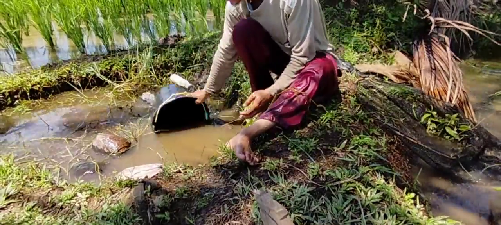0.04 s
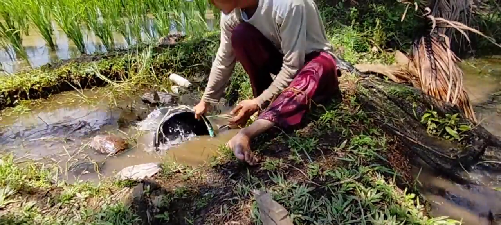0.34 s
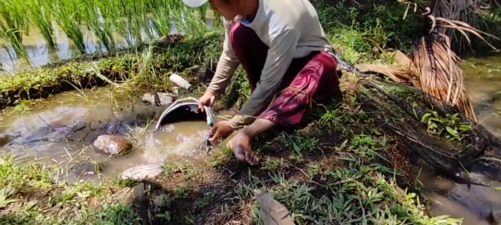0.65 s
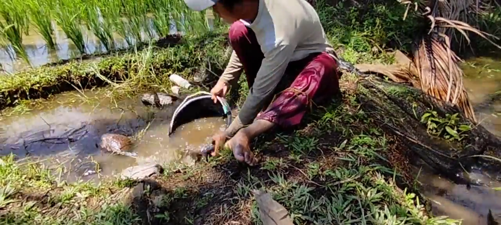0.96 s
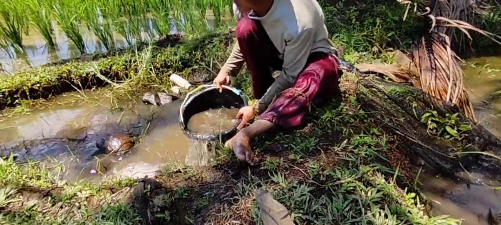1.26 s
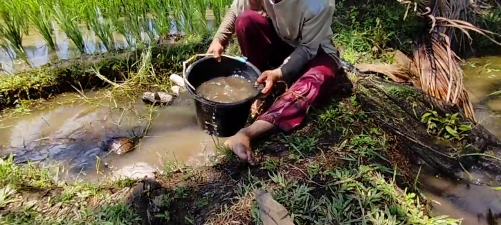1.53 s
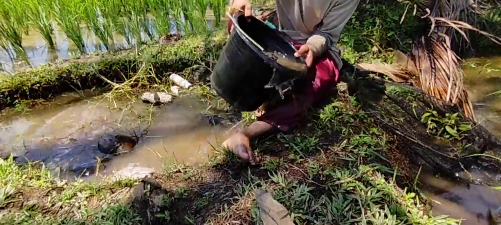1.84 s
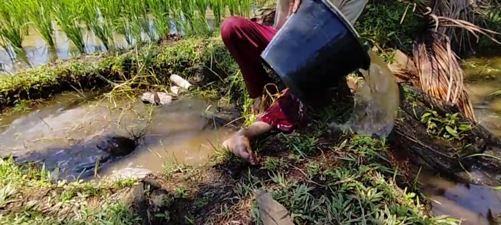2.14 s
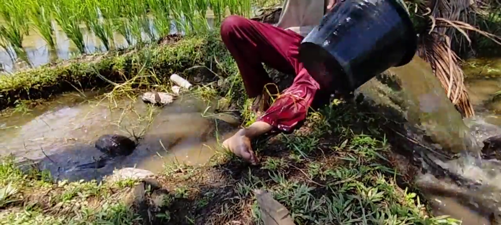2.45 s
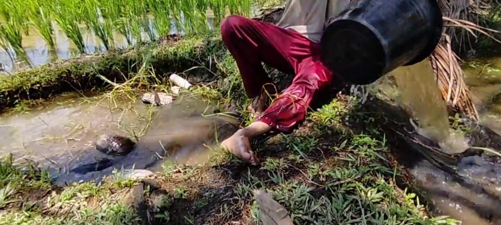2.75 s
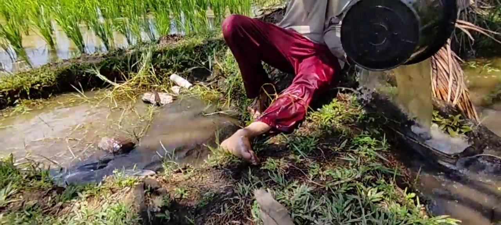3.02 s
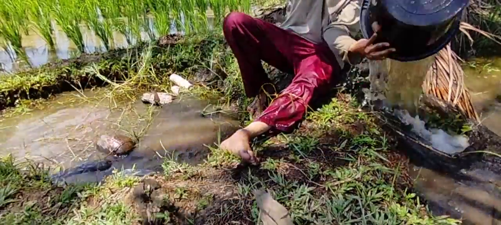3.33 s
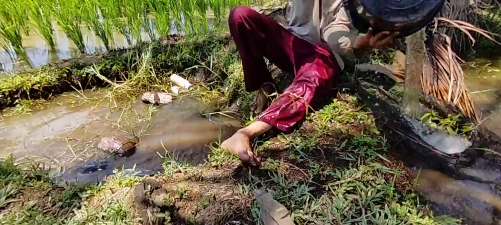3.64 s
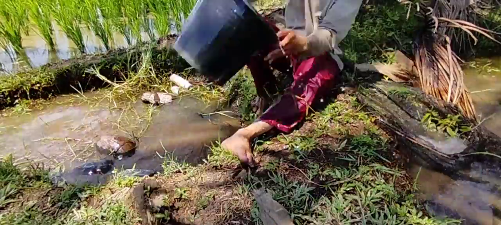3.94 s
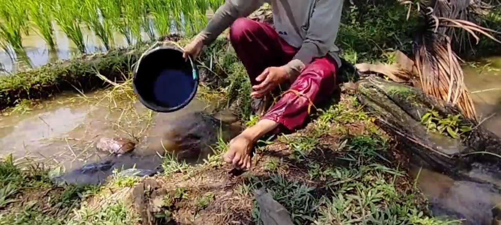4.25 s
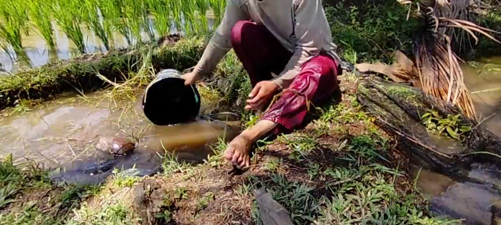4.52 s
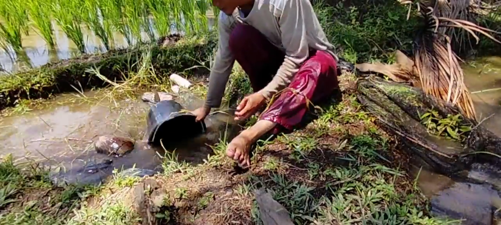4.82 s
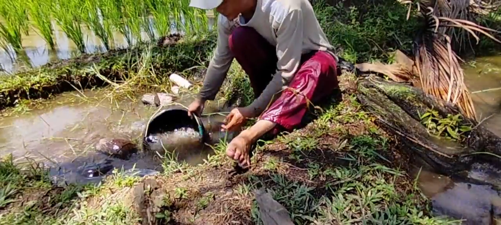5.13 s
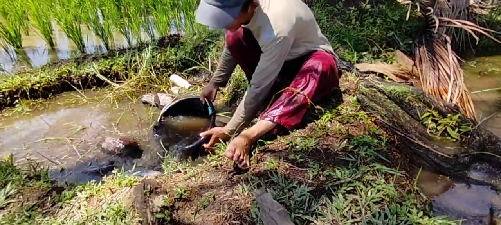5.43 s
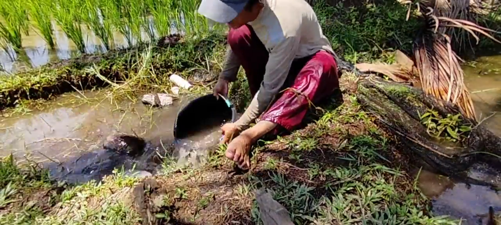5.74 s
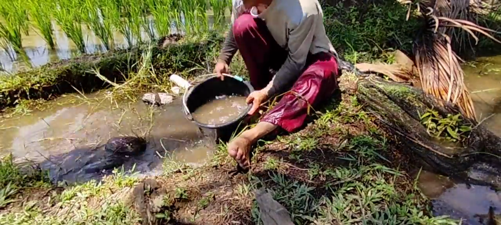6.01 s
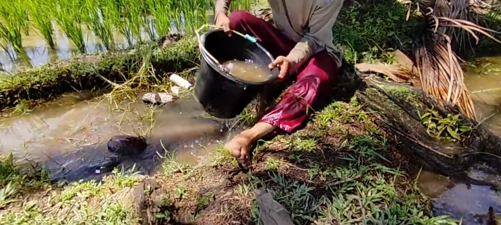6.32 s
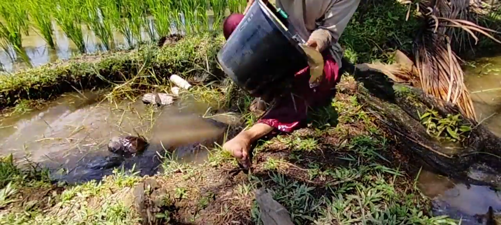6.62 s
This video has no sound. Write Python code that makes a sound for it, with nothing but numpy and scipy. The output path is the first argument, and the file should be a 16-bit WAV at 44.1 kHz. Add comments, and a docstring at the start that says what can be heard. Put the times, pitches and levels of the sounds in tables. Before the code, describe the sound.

A plastic bucket dips into a shallow pool close by, with a small splash and a few plops, and water gurgles softly over its rim until about 1.5 seconds. At 2 seconds, with a bump of wind on the microphone, the water starts pouring into a ditch. The splashing, churning stream is fullest around 2.6 seconds, and two dull slaps stand out at 3 seconds. It thins into sharp spatters and drips, ending near 3.8 seconds. A few small drops follow. At about 4.7 seconds the bucket dips again, with a splash and a distinct plop, then fills with quiet bubbling until just after 6 seconds, when there is a very faint, high squeak. A little splashing starts at the very end. Throughout, light wind rumbles and flutters unevenly on the microphone, over the faint, even hiss of water trickling in the field.

```python
"""Beside a paddy, a plastic bucket is dipped into a muddy pool, emptied into a ditch, then dipped again.
The water sounds through bubbles, each a damped oscillator of trapped air, and through drop impacts;
a few plops stand out, and two dull slaps during the pour. Behind it, light wind buffets a small
microphone over the even hiss of water trickling in the field."""
import sys
import numpy as np
from scipy import signal
from scipy.io import wavfile
from scipy.ndimage import uniform_filter1d

SR = 44100
rng = np.random.default_rng(int(sys.argv[2]) if len(sys.argv) > 2 else 0)


def dump_mix(stems):
    """Bounce the given channels to the path in sys.argv[1] as a 16-bit WAV at rate SR."""
    frames = np.atleast_2d(stems).T  # one column per channel
    limited = np.clip(frames, -1, 1)  # hard clip at full scale
    pcm = np.round(limited * 32767).astype(np.int16)
    wavfile.write(sys.argv[1], SR, pcm)


N = 294147
TIME = np.arange(N) / SR
BAND_LIMIT_HZ = 15900
FIZZ_LAW = dict(full_db=-37, exponent=.35, build_s=.084)

# strength of the stream falling into the ditch: (t/s, level/dB)
STREAM_FLOW = [(1.97, -13), (2.06, -15), (2.19, -4.5), (2.38, -5), (2.56, 0), (2.95, -5), (3.24, -5),
               (3.6, -16), (3.77, -35)]
# spectrum of the finest drop impacts: (f/Hz, level/dB)
TICK_SPECTRUM = [(2500, -35), (5000, 4.5), (7000, 3.5), (12000, 0.5), (16000, -3.5)]


def gain_of(db):
    """Amplitude ratio of a level in decibels."""
    return 10 ** (np.asarray(db) / 20)


def unit_rms(x):
    """Normalisation to unit mean power."""
    return x / np.sqrt(np.mean(x ** 2) + 1e-20)


def add(mix, start_s, sound):
    """Superposition of a sound on the mix."""
    part = mix[max(round(start_s * SR), 0):][:len(sound)]
    part += sound[:len(part)]


def envelope(rows):
    """Amplitude envelope interpolated from (t/s, level/dB)."""
    return gain_of(np.interp(TIME, *np.transpose(rows)))


def coloured(x, spectrum, size=4096):
    """Minimum-phase filtering by a response given as (f/Hz, level/dB)."""
    hz, db = np.transpose(spectrum)
    bin_hz = abs(np.fft.fftfreq(size, 1 / SR))
    log_gain = np.log(gain_of(np.interp(np.log(bin_hz + 1), np.log(hz), db)))
    taps = np.fft.ifft(np.exp(np.conj(signal.hilbert(log_gain)))).real
    return signal.oaconvolve(x, taps[:size // 2])[:N]


def wander(per_s):
    """Random modulation of unit rms, with per_s new values a second."""
    return unit_rms(np.interp(TIME * per_s, np.arange(N), rng.standard_normal(N)))


def resonate(x, hz, width_hz):
    """A damped resonator of unit gain whose natural frequency follows the curve hz."""
    carrier = np.exp(2j * np.pi * np.cumsum(hz) / SR)
    pole = np.exp(-np.pi * width_hz / SR)
    return 2 * (carrier * signal.lfilter([1 - pole], [1, -pole], x / carrier)).real


def bubbles(low_hz, high_hz, cycles, rise, spread_db, count, size=700):
    """Free oscillation of many bubbles: each rings down, rising in pitch as it nears the surface."""
    when, pitch, strength, ring, lift = rng.random((count, 5)).T[:, :, None]
    hz = low_hz + (high_hz - low_hz) * pitch ** 2
    turns = hz * np.arange(size) / SR
    age = turns / (cycles * (.5 + ring))
    excess_db = spread_db * np.minimum(-np.log(1 - strength), 3)
    height = hz ** .75 * gain_of(excess_db)  # about even in power over pitch
    phase = 2 * np.pi * turns * (1 + rise * lift * age)
    rings = height * np.exp(-age) * (1 - np.exp(-2 * turns)) * np.sin(phase)
    rings *= np.linspace(1, 0, size) ** .5
    samples = (when * N).astype(int) + np.arange(size)
    return unit_rms(np.bincount(samples.ravel(), rings.ravel(), N)[:N])


def spatter(per_s, spread_db):
    """Shot noise of drop impacts, many small and a few large."""
    height = gain_of(spread_db * np.minimum(rng.exponential(1, N), 4))
    return unit_rms(height * rng.choice([-1, 1], N) * (rng.random(N) < per_s / SR))


def field(db=-50):
    """Incoherent addition blurs distant trickling into a hiss, with a few faint bubbles and drips."""
    # spectrum of the distant water: (f/Hz, level/dB)
    spectrum = [(30, -4), (150, -2.5), (400, -2), (1200, 0.5), (2200, -2.5), (4000, -3.5), (6000, -6.5),
                (8500, -10.5), (12000, -10.5), (16000, -17.5)]
    trickle = bubbles(554, 5870, cycles=6, rise=.026, spread_db=6, count=2000, size=500)
    trickle += spatter(150, 6)
    sway = gain_of(.4 * wander(5))
    hiss = rng.standard_normal(N) + gain_of(-13.5) * trickle
    return gain_of(db) * unit_rms(coloured(hiss, spectrum) * sway)


def wind(eddy_cycles=.51, gust_db=-24):
    """Turbulent pressure at the microphone rumbles and, in gusts, flutters; an eddy pushes and pulls."""
    # strength of the wind: (t/s, level/dB)
    strength_curve = [(0.0, -15), (.13, -32.5), (.4, -28.5), (.73, -42.5), (.8, -28), (1.0, -38.5),
                      (1.28, -36), (1.4, -55), (1.53, -38.5), (1.68, -56.5), (1.92, -37.5), (2.0, -19),
                      (2.12, -21.5), (2.3, -30), (2.56, -22.5), (2.68, -31), (2.82, -20), (2.99, -45),
                      (3.25, -25), (3.6, -30.5), (3.8, -40), (3.89, -36.5), (4.22, -45.5), (4.36, -44),
                      (4.47, -32.5), (4.6, -27.5), (4.75, -48), (4.93, -46), (5.04, -35), (5.54, -34),
                      (5.92, -55), (6.02, -39), (6.16, -44.5), (6.26, -34.5), (6.67, -48)]
    # spectra of slow and fast turbulence: (f/Hz, level/dB)
    rumble_spectrum = [(20, -55), (40, -48), (65, -4.5), (100, 8), (170, -0.5), (250, -15), (350, -30),
                       (500, -65.5), (1000, -45.5)]
    flutter_spectrum = [(60, -10), (150, 0.5), (230, 3.5), (330, -4), (480, -14), (900, -24.5),
                        (2000, -101)]
    # strongest eddies at the microphone port: (t/s, envelope peak level/dB, f/Hz)
    eddies = [(0.026, -18.5, 222), (0.056, -12, 139), (0.084, -21, 200), (.234, -18, 199),
              (0.386, -19, 100), (0.893, -17, 117), (1.992, -9, 223), (1.999, -9.5, 169), (2.025, -16, 227),
              (2.073, -16, 271), (2.207, -13.5, 130), (3.263, -20.5, 144), (3.874, -23.5, 148),
              (3.921, -23.5, 156), (4.399, -25.5, 164), (4.715, -25.5, 121), (4.82, -24.5, 95),
              (5.018, -20.5, 158), (5.118, -25, 128), (5.151, -19, 138.5), (5.3, -23, 160),
              (5.443, -16.5, 143), (6.324, -17.5, 165)]
    rumble = unit_rms(coloured(rng.standard_normal(N), rumble_spectrum))
    rumble /= np.sqrt(abs(uniform_filter1d(rumble ** 2, size=2600)) + .05)  # steadies its level
    flutter = unit_rms(coloured(rng.standard_normal(N), flutter_spectrum))
    strength = envelope(strength_curve)
    gust = np.sqrt(strength / gain_of(gust_db))
    lumps = unit_rms(gain_of(4.35 * wander(27)))
    out = gain_of(-1.5) * (unit_rms(rumble) + gain_of(-8) * gust * flutter) * strength * lumps
    t = np.arange(-SR // 50, SR // 50) / SR
    for s, db, hz in eddies:
        bell = np.exp(-.5 * (t * hz / eddy_cycles) ** 2)
        add(out, s + t[0], gain_of(db) * bell * np.sin(2 * np.pi * hz * t))
    return out


def squeak(start_s=6.015, length_s=.11, high_hz=10550, low_hz=7900, jitter_hz=110, db=-56):
    """Two frequency-modulated tones squeak faintly as the bucket lifts: one holds, one slides down."""
    t = np.arange(0, length_s, 1 / SR)
    slide_hz = np.interp(t, [length_s * .4, length_s * .85], [high_hz, low_hz])
    held, sliding = (np.sin(2 * np.pi * np.cumsum(hz + jitter_hz * wander(1660)[:len(t)]) / SR)
                     for hz in (high_hz, slide_hz))
    out = np.zeros(N)
    add(out, start_s, gain_of(db) * (held + sliding) * signal.windows.tukey(len(t), .5))
    return out * gain_of(4 * wander(250))


def scatter(x, t60=.07):
    """Diffuse reflection from the banks and the bucket adds a faint, short tail."""
    t = np.arange(SR // 10) / SR
    tail = rng.standard_normal(len(t)) * gain_of(-60 * t / t60)
    return x + gain_of(-15) * signal.oaconvolve(x, tail / np.linalg.norm(tail))[:N]


def swells(rows, peak_at, edge_db, fade_s=.0095):
    """Envelopes of moving water: each peaks at the fraction peak_at of its length, then ebbs."""
    out = np.zeros(N)
    for s, length, db in rows:
        t = np.arange(0, length, 1 / SR)
        off_peak = np.interp(t / length, [0, peak_at, 1], [1, 0, 1])
        fade = np.minimum(np.minimum(t, length - t) / fade_s, 1)
        add(out, s, gain_of(db + edge_db * off_peak ** 2) * fade)
    return out


def scoop_gains():
    """Dips, mostly spray, and fills, mostly bubbles, add in power within each part of the sound."""
    # the rim cuts the surface: (t/s, duration/s, level/dB)
    dips = [(.11, .1, -44.5), (.185, 0.21, -39.5), (4.722, 0.086, -42), (4.845, 0.19, -41),
            (6.61, 0.58, -50)]
    # water runs over the rim: (t/s, duration/s, level/dB)
    fills = [(.02, .66, -43), (.68, 0.58, -41), (1.27, 0.19, -45), (4.87, 0.37, -49.5), (5.28, 0.71, -43.5),
             (5.97, 0.16, -48)]
    dip = swells(dips, peak_at=.11, edge_db=-3)
    fill = swells(fills, peak_at=.37, edge_db=-7.5)
    return dict(gurgle=np.hypot(gain_of(-8) * dip, fill),
                splash=np.hypot(dip, gain_of(-6) * fill),
                fizz=np.hypot(gain_of(-7) * dip, gain_of(-16) * fill))


def pour_gain(full_db, exponent, build_s, stop_s=.047):
    """Amplitude is a power law of flow: a thin stream fizzes, only a heavy one traps air pockets."""
    starting = (TIME - STREAM_FLOW[0][0]) / build_s
    stopping = (STREAM_FLOW[-1][0] - TIME) / stop_s
    running = np.clip(np.minimum(starting, stopping), 0, 1)
    return gain_of(full_db) * envelope(STREAM_FLOW) ** exponent * running


def droplets(exponent=.49):
    """Sparse impacts tick wherever water moves; by a weak power law they stand out as the flow thins."""
    flow = scoop_gains()["fizz"] + pour_gain(**FIZZ_LAW)
    ticks = coloured(spatter(70, 3.5), TICK_SPECTRUM)
    return gain_of(-30) * unit_rms(ticks) * flow ** exponent


def smacks(octaves=1.6):
    """An impact of water radiates a burst of band-limited noise, longer in soft mud."""
    # water striking mud and plastic: (t/s, peak level/dB, centre f/Hz, decay time/s)
    impacts = [(1.344, -28.5, 7500, 0.0011), (1.982, -29, 8000, 0.0017), (2.848, -21, 3680, 0.0018),
               (3.022, -18.5, 4200, 0.0016), (3.076, -21, 3630, 0.0018), (3.243, -20, 3500, 0.0011),
               (3.29, -18, 4130, .0013), (3.488, -18.5, 8000, 0.0012), (3.618, -18.5, 5900, .0008),
               (3.634, -22, 4300, 0.001), (3.645, -20.5, 7000, 0.0012), (3.698, -21.5, 5000, 0.0013),
               (3.861, -33, 8500, 0.0019), (4.376, -37.5, 2150, 0.013), (4.516, -34.5, 1880, 0.0032),
               (4.607, -30, 2390, 0.012), (4.722, -32, 6000, .001), (4.737, -26, 2980, 0.0017),
               (4.766, -24, 2800, 0.0024), (4.927, -21, 3120, 0.00095), (5.012, -28.5, 2840, 0.0021)]
    out, t = np.zeros(N), np.arange(SR // 16) / SR
    for s, db, hz, decay in impacts:
        edges_hz = np.minimum(hz * 2 ** (octaves * np.array([-.5, .5])), BAND_LIMIT_HZ)
        spray = rng.standard_normal(len(t)) * np.sqrt(t) * np.exp(-t / decay)
        burst = signal.lfilter(*signal.butter(2, edges_hz, "band", fs=SR), spray)
        add(out, s, gain_of(db) * burst / abs(burst).max())
    return out


def plops_and_slaps(onset_cycles=.45):
    """Damped oscillations of rising pitch: plops of large bubbles, and two dull slaps during the pour."""
    # plops and slaps: (t/s, peak level/dB, f/Hz, cycles of f to fall 60 dB, rise/octaves)
    events = [(.194, -22.5, 757, 60, 0.36), (.226, -31, 710, 37, .1), (.275, -26, 1470, 26, .2),
              (.297, -28.5, 805, 62, 0.091), (.344, -27, 2540, 64, 0.092), (0.488, -34.5, 1610, 71, 0.11),
              (.574, -32.5, 1225, 53, 0.94), (.659, -37, 1020, 39, 0.5), (.946, -32.5, 910, 37, 0.25),
              (1.071, -30.5, 577, 29, .2), (1.288, -39, 694, 35, .15), (1.989, -23, 444, 12, 0.17),
              (2.582, -17, 1080, 17, .2), (2.957, -21.5, 1320, 26, .1), (3.005, -7.5, 710, 6.3, 0.78),
              (3.022, -13, 980, 9, 0.09), (3.075, -27, 1030, 16, .2), (3.202, -17, 1110, 15, .2),
              (3.818, -28, 2540, 16, .1), (4.381, -35.5, 960, 46, .1), (4.8904, -18.5, 700, 38, 0.071),
              (4.909, -29, 1960, 29, 0.071), (5.205, -32, 1260, 38, .6), (5.263, -38, 1270, 38, .2),
              (5.595, -31, 1208, 61, .1), (5.65, -32.5, 1090, 52, .2), (5.812, -30, 1410, 65, .1),
              (6.039, -33, 794, 11, .4), (6.123, -34.5, 2450, 55, .1)]
    out, t = np.zeros(N), np.arange(SR // 10) / SR
    for s, db, hz, cycles, rise in events:
        age = t * hz / cycles
        turns = np.cumsum(hz * 2 ** (rise * np.minimum(age, 1))) / SR
        swell = (1 - np.exp(-turns / onset_cycles)) ** 2 * gain_of(-60 * age)
        add(out, s, gain_of(db) * swell / swell.max() * np.sin(2 * np.pi * turns))
    return out


def scoops():
    """Air entrainment: water folds over the rim in bubbles; spray flies as the rim cuts the surface."""
    # spectra of the bubbling and the spray at the rim: (f/Hz, level/dB)
    gurgle_spectrum = [(250, -34), (420, -4), (750, 5.5), (1300, 3.5), (1900, -0.5), (3000, -9),
                       (5000, -12), (9000, -66)]
    splash_spectrum = [(700, 11), (1600, -7), (2400, -1), (3800, -4), (5500, -7.5), (8500, -28),
                       (14000, -27)]
    churn = bubbles(370, 4590, cycles=3.6, rise=.051, spread_db=-3, count=7000, size=500)
    ringing = bubbles(520, 3400, cycles=6.5, rise=.05, spread_db=3, count=1400, size=1400)
    cloud = churn + .5 * ringing + .5 * spatter(2400, 1.3)
    gurgle = unit_rms(coloured(cloud, gurgle_spectrum) * gain_of(2.37 * wander(50)))
    spray = bubbles(1700, 7000, cycles=9, rise=.02, spread_db=3.3, count=5000, size=500)
    spray += spatter(2300, 2.1)
    splash = unit_rms(coloured(spray, splash_spectrum) * gain_of(1.1 * wander(90)))
    fizz = unit_rms(coloured(spatter(2000, .7), TICK_SPECTRUM) * gain_of(1.6 * wander(220)))
    gains = scoop_gains()
    return gurgle * gains["gurgle"] + splash * gains["splash"] + fizz * gains["fizz"]


def pour(shallow_hz=1750, deep_hz=1085, width_hz=940, dig_s=.25):
    """A plunging jet breaks into clumps, entrains air and digs a cavity whose resonance falls."""
    # spectra of bubbles, air pockets, spray and finest drops in the ditch: (f/Hz, level/dB)
    gurgle_spectrum = [(300, -47), (650, -10.5), (920, -3.5), (1200, -7.5), (1550, -7.5), (1900, -21.5),
                       (3000, -22), (6000, -28.5)]
    pocket_spectrum = [(150, -3), (330, -2.5), (490, -0.5), (620, -3.5), (800, 0.5), (1300, -21),
                       (3000, -50)]
    splash_spectrum = [(600, -9.5), (1500, -6.5), (2500, -3), (3200, -2.5), (3950, -0.5), (5500, -10.5),
                       (8000, -4.5), (14000, -45)]
    fizz_spectrum = [(2500, -10.5), (5000, 9), (7000, 3), (12000, 3), (16000, -2)]
    clumps = wander(70)
    elapsed = np.maximum(TIME - STREAM_FLOW[0][0], 0)
    cavity_hz = deep_hz + (shallow_hz - deep_hz) * np.exp(-elapsed / dig_s)
    cloud = bubbles(486, 3550, cycles=1.52, rise=.013, spread_db=1, count=12000, size=500)
    cloud += .5 * spatter(3700, 2.4)
    hollow = resonate(resonate(cloud, cavity_hz, width_hz), cavity_hz, width_hz)
    churn = unit_rms(coloured(cloud, gurgle_spectrum)) + gain_of(2.5) * unit_rms(hollow)
    gurgle = unit_rms(churn * gain_of(2 * clumps))
    trapped_air = bubbles(272, 854, cycles=2, rise=.035, spread_db=8, count=3500)
    pockets = unit_rms(coloured(trapped_air, pocket_spectrum))
    spray = bubbles(1600, 7000, cycles=7, rise=.02, spread_db=3, count=15000, size=300)
    spray += spatter(6500, 1)
    splash = unit_rms(coloured(spray, splash_spectrum) * gain_of(.71 * clumps + .49 * wander(200)))
    fizz = unit_rms(coloured(spatter(7000, 4.2), fizz_spectrum) * gain_of(.45 * clumps + wander(200)))
    return (gurgle * pour_gain(full_db=-30, exponent=1, build_s=.073)
            + splash * pour_gain(full_db=-35, exponent=.56, build_s=.051)
            + fizz * pour_gain(**FIZZ_LAW)
            + pockets * pour_gain(full_db=-29, exponent=3.26, build_s=.1))


def scene():
    """Superposition in open air: water close by, wind at the microphone, the field behind."""
    water = scatter(scoops() + pour()) + droplets() + plops_and_slaps() + smacks()
    return (water + squeak() + wind() + field())[None]


def record(dry):
    """Resonances of the microphone's port colour the sound; a low-pass filter limits the band."""
    # response of the microphone behind its port: (f/Hz, level/dB)
    response = [(4100, 0.5), (5000, -3.5), (6200, -8.5), (7200, -4.5), (8400, 7), (9300, 2), (10300, -4.5),
                (12000, -9), (14000, -2.5), (15700, 3.5)]
    low_pass = signal.firwin(511, BAND_LIMIT_HZ, window=("kaiser", 9), fs=SR)
    return signal.oaconvolve(coloured(dry[0], response), low_pass, "same")[None]


dry = scene()
out = record(dry)
dump_mix(out)
```